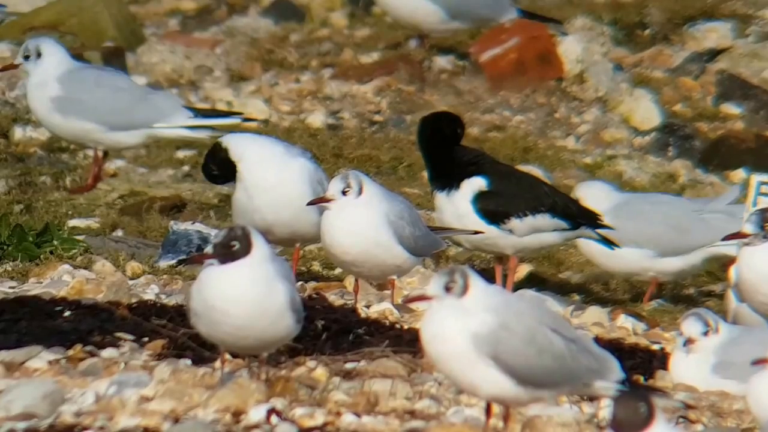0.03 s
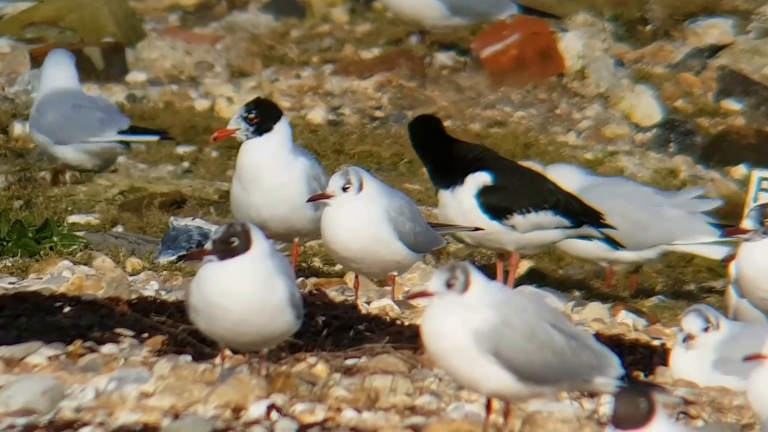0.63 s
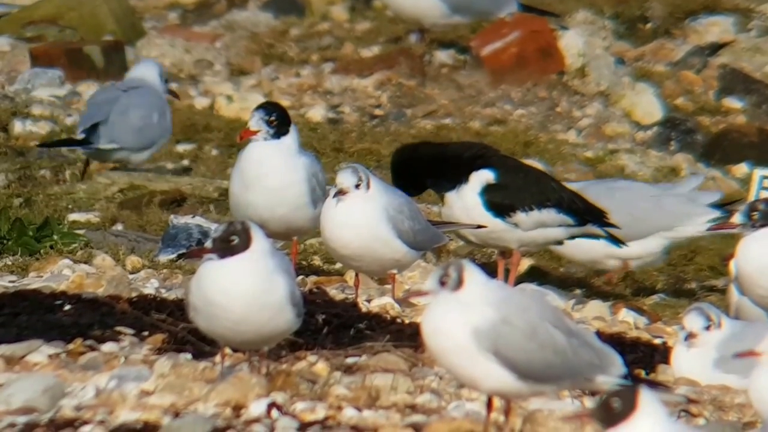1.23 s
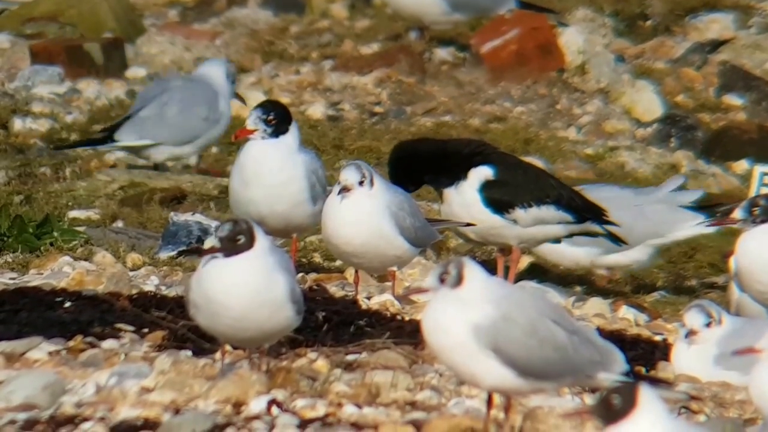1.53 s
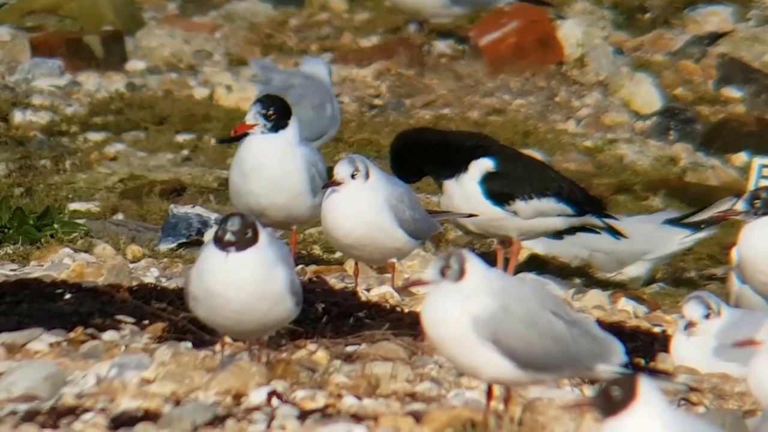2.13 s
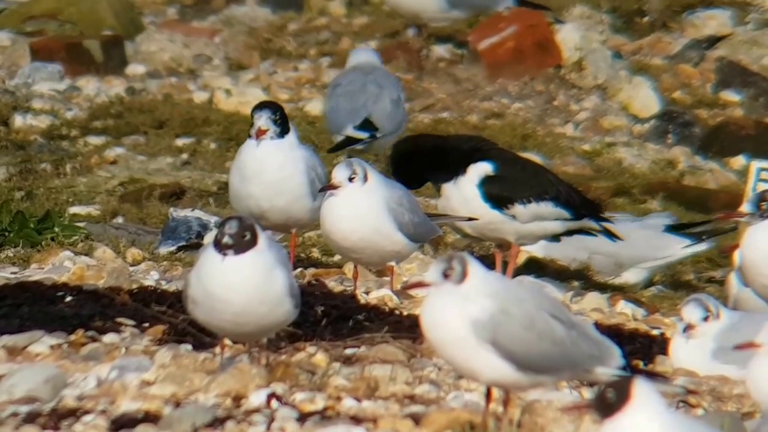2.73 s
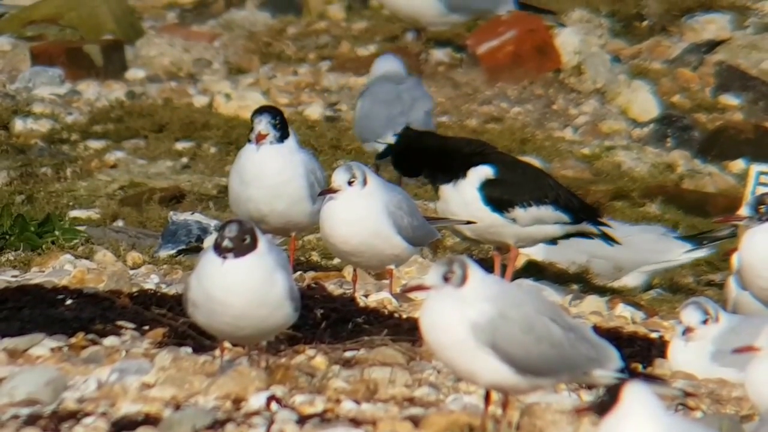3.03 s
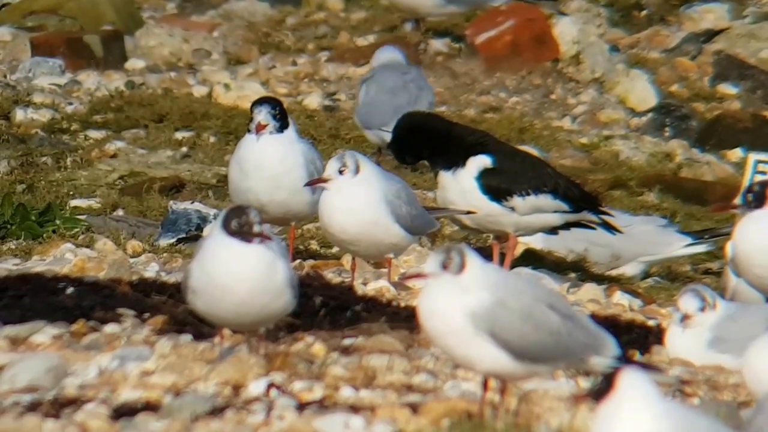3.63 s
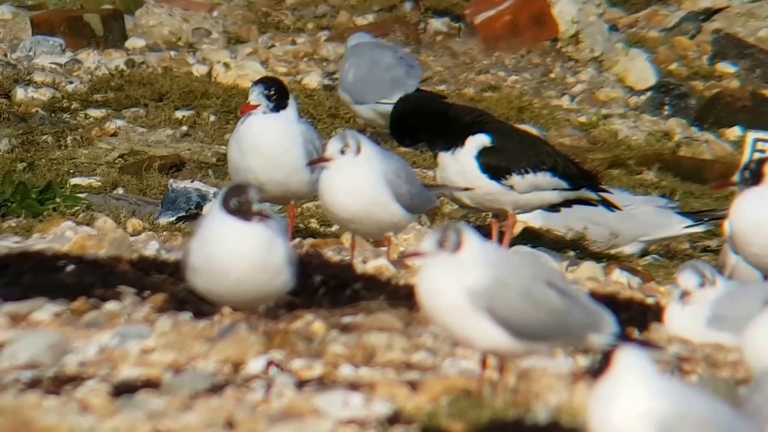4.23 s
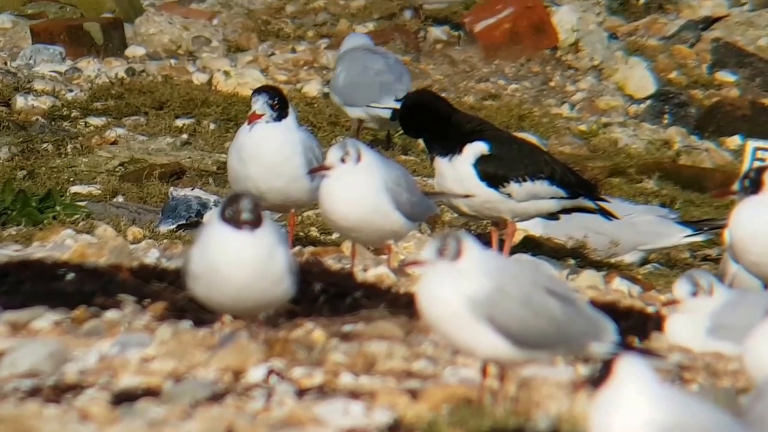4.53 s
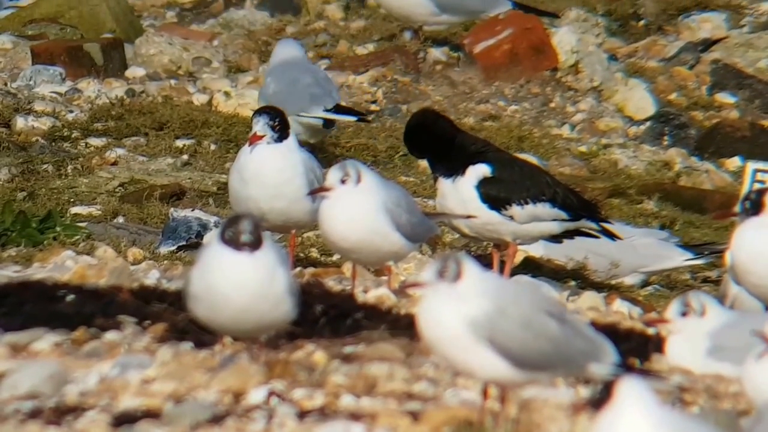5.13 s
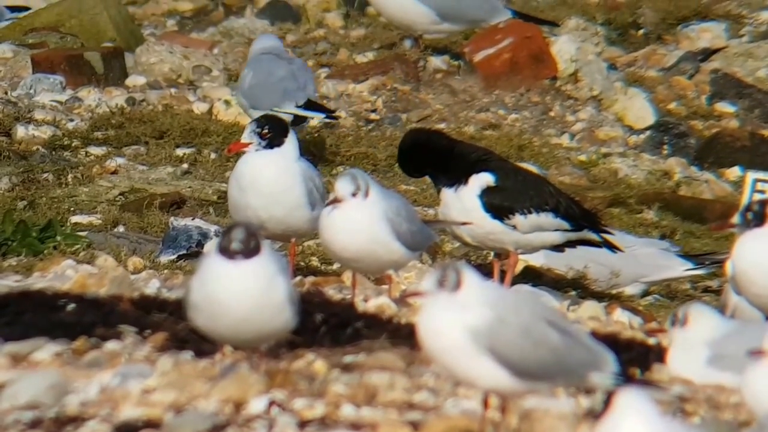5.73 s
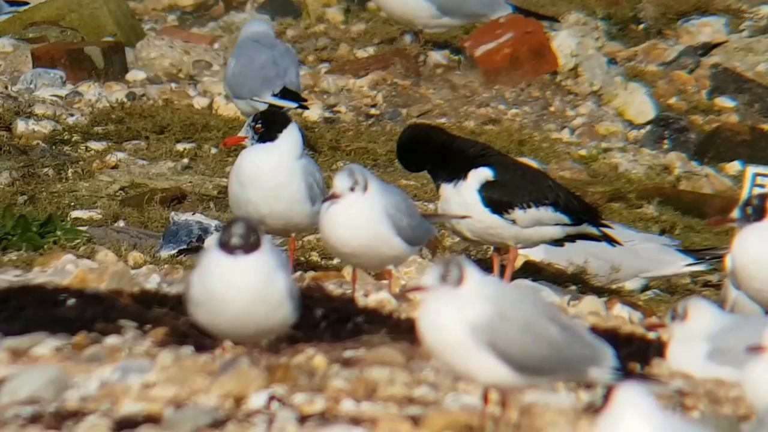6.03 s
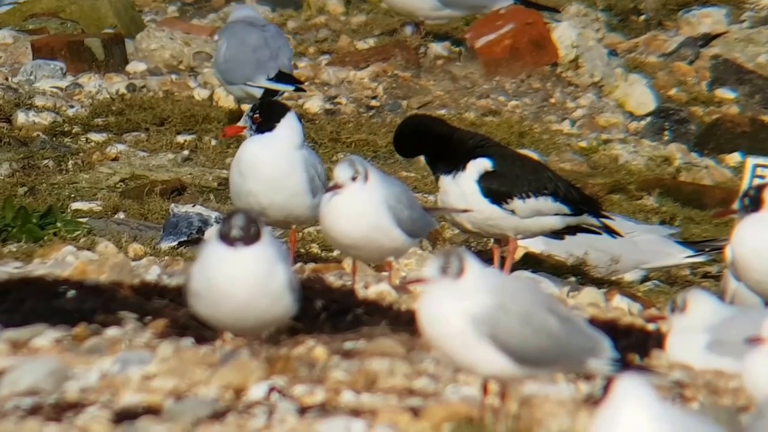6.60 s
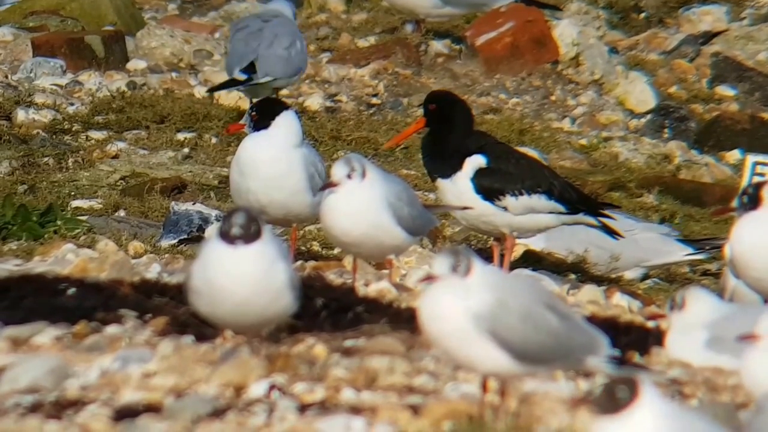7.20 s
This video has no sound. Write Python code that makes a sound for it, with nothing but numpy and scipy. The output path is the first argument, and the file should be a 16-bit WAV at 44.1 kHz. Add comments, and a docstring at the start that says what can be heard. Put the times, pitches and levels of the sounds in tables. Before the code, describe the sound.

Gusty wind buffets the microphone from the start, an uneven low rumble with small crackles and thumps, often stronger on the left. Beneath it lie the steady wash of an open shingle shore and a faint hiss. At about 2.2 seconds, distant oystercatchers begin to pipe: short, high, almost pure whistles that arch up and drop, quiet and sometimes overlapping. A nearer gull, close to the centre, gives three harsh, rattling calls at about 3.1, 3.7 and 4.4 seconds, each a little under half a second long and standing out above the piping. The wind grows somewhat stronger in the second half, with notable gusts around 4.7, 5.9 and 6.9 seconds. The piping becomes busier after the gull stops and continues with the wind until the end, at about 7.4 seconds.

```python
"""A gull colony on a windy shingle shore. From the start, turbulent gusts buffet each of two
microphones over the steady wash of the shore and a faint hiss. After about 2 s distant
oystercatchers begin to pipe arched, almost pure whistles. Between 3.1 and 4.8 s a nearer gull
gives three harsh, rattling calls: a pulsed harmonic source filtered by its throat and bill.
The piping and the wind go on to the end."""
import sys
import numpy as np
from scipy import signal
from scipy.fft import rfft, irfft, next_fast_len
from scipy.io import wavfile
from scipy.ndimage import uniform_filter1d

SR = 44100
rng = np.random.default_rng(int(sys.argv[2]) if len(sys.argv) > 2 else 0)


def master(y):
    """Save y as 16-bit WAV."""
    cut = np.clip(np.atleast_2d(y).T, -1, 1)
    pcm = np.round(cut * 32767)  # scale
    wavfile.write(sys.argv[1], SR, pcm.astype(np.int16))


N = 320166
TIME = np.arange(N) / SR
TOP_HZ = 15800
SIDES = np.array([[1], [-1]])  # left, right


def undb(db):
    """Amplitude ratio of a level in decibels."""
    return 10 ** (np.asarray(db) / 20)


def unit(x):
    """Normalisation to an rms of 1."""
    return x / np.sqrt(np.mean(x ** 2) + 1e-20)


def steady(x, window_s=0.033):
    """Normalisation by the running rms, which flattens the envelope."""
    return x / np.sqrt(np.abs(uniform_filter1d(x ** 2, int(window_s * SR))) + 1e-12)


def response(spectrum, hz):
    """Gain of a (frequency [Hz], level [dB]) spectrum, interpolated in log frequency."""
    f, db = np.transpose(spectrum)
    return undb(np.interp(np.log(hz + 1), np.log(f), db))


def colour(x, gain):
    """Linear filtering: the spectrum of x is multiplied by gain(frequency)."""
    n = x.shape[-1]
    size = next_fast_len(n)
    return irfft(rfft(x, size) * gain(np.arange(size // 2 + 1) * SR / size), size)[..., :n]


def walk(rate, n=N):
    """Smooth random modulation with `rate` new values a second and a spread near 1."""
    k = max(int(SR / rate), 1)
    held = np.repeat(rng.standard_normal(n // k + 2), k)[rng.integers(k):][:n]
    return 1.35 * uniform_filter1d(uniform_filter1d(held, k), k)


def add(out, start, x):
    """Superposition of a stereo signal from `start` seconds on."""
    i = int(np.clip(start * SR, 0, N))
    out[:, i:i + x.shape[1]] += x[:, :N - i]


def place(x, lead_ms, pan_db):
    """Time and level differences: sound from the left reaches the left microphone first."""
    late = colour(x, lambda f: np.exp(-2j * np.pi * f * lead_ms / 1000))
    return np.array([x, late]) * undb(SIDES * pan_db / 2)


def shares(pan_db):
    """Constant-power law: left and right gains that split one power between the microphones."""
    return np.sqrt(2 / (1 + undb(-2 * SIDES * pan_db)))


def scatter(x, wet_db, t60):
    """Diffuse reflection from the shingle and the bank adds a short, exponentially decaying tail."""
    t = np.arange(SR // 2) / SR
    tail = rng.standard_normal((2, len(t))) * np.exp(-np.log(1000) * t / t60) * (t > .004)
    tail /= np.sqrt(np.sum(tail ** 2, axis=1, keepdims=True))
    return x + undb(wet_db) * signal.fftconvolve(x, tail, axes=1)[:, :N]


def shade(x, hz=2420, width_hz=280):
    """Diffraction round the recorder's body shifts the right channel's phase in one narrow band."""
    def all_pass(f):
        detune = 1j * (f ** 2 - hz ** 2)
        return (detune - f * width_hz) / (detune + f * width_hz)
    return np.array([x[0], colour(x[1], all_pass)])


def shore(level_db=-47, shared=0.56, ebb_db_per_s=0.2048):
    """Partial coherence: the microphones share some of the ebbing wash, but none of their hiss."""
    # spectrum of the shore with the microphones' hiss: (frequency [Hz], relative density [dB])
    spectrum = [(18, -41), (30, -11), (69, 0), (111, -0.5), (202, -11), (767, -10), (1230, -21.5),
                (1680, -24), (2690, -25), (3400, -28.5), (5450, -42.5), (9680, -48), (15500, -42.5)]
    noise = unit(colour(rng.standard_normal((3, N)), lambda f: response(spectrum, f)))
    own, common = noise[:2], noise[2]
    mid_band = lambda f: f ** 2 / (f ** 2 + 250 ** 2) / (1 + (f / 5000) ** 4)
    own_wash = colour(own, mid_band)
    common_wash = place(colour(common, mid_band), lead_ms=0.4, pan_db=0)
    wash = np.sqrt(1 - shared) * own_wash + np.sqrt(shared) * common_wash
    wash_db = 0.08 - ebb_db_per_s * TIME + 0.34 * walk(13)
    hiss = own - own_wash
    return undb(level_db) * (hiss + wash * undb(wash_db))


def airflow(breeze_db=-2, gust_db=1, puff_db=2.5, puffs_per_s=15):
    """Incoherent addition: the powers of breeze and gusts sum to each microphone's wind level in dB."""
    # the breeze between gusts: (time [s], relative level [dB], left minus right [dB])
    breeze = [(0.0, -48.5, 11), (1.0, -50, 11), (2.0, -44.5, 13.5), (2.7, -40, 17), (3.0, -42.5, 1),
              (3.4, -40.5, -8.5), (3.6, -48, 5), (3.9, -39, -4), (4.5, -42.5, -3.5), (5.0, -34.5, 4.5),
              (5.35, -46.5, 12), (5.8, -41.5, 0.5), (6.1, -47.0, 9), (6.3, -47, 1), (6.5, -42.5, -7),
              (6.8, -62, -5), (7.0, -36.5, 3), (7.26, -45.5, 4)]
    # gusts on the microphones: (start [s], length [s], relative level [dB], left minus right [dB])
    gusts = [(0.065, 0.06, -40, 0.5), (0.217, 0.091, -43, 15), (0.38, 0.042, -40.5, 1),
             (0.512, 0.066, -38, 20), (0.58, 0.23, -44, 11), (0.85, 0.03, -47, 21), (1.087, 0.041, -41, 14),
             (1.227, 0.016, -37.5, 22.5), (1.519, 0.036, -38.5, 14.5), (1.798, 0.051, -37.0, 14),
             (1.921, 0.048, -37, 3), (2.07, 0.067, -37.5, 2), (2.19, 0.05, -42, 7),
             (2.338, 0.22, -41.5, 27), (2.572, 0.043, -36.5, 26), (2.755, 0.088, -34.5, 3.5),
             (3.031, 0.089, -36.5, 25), (3.125, 0.066, -36.5, -0.5), (3.256, 0.17, -40.5, 1),
             (3.823, 0.043, -36, 3), (3.907, 0.08, -36, -5.5), (4.043, 0.02, -35.5, 2),
             (4.175, 0.037, -35, 4), (4.298, 0.13, -40.5, 5), (4.541, 0.065, -33.5, 5),
             (4.623, 0.067, -30.5, 2.5), (4.765, 0.014, -27.5, 21), (4.814, 0.093, -42, -10),
             (4.957, 0.21, -36.5, 3), (5.192, 0.16, -38.5, 13), (5.395, 0.11, -36.5, 11),
             (5.528, 0.035, -36, 6), (5.714, 0.093, -40, 18), (5.868, 0.023, -31.5, 3),
             (5.934, 0.0623, -37, -4.5), (6.366, 0.076, -44.0, -4), (6.563, 0.3, -44.5, -9),
             (6.882, 0.056, -30, -1), (6.967, 0.058, -35.5, 0), (7.227, 0.08, -36.5, 7)]
    attack_s, release_s = 0.022, 0.017
    times, *columns = np.transpose(breeze)
    db, pan_db = [np.interp(TIME, times, column) for column in columns]
    puffs = np.array([walk(puffs_per_s), walk(puffs_per_s)])
    power = (shares(pan_db) * undb(db + breeze_db + puff_db * puffs)) ** 2
    for start, length, db, pan_db in gusts:
        t = np.arange(-attack_s / 2, length + release_s / 2, 1 / SR)
        envelope = np.clip(np.minimum(t / attack_s, (length - t) / release_s) + .5, 0, 1)
        add(power, start + t[0], (shares(pan_db) * envelope * undb(db + gust_db)) ** 2)
    return 10 * np.log10(power)


def wind(flow_db, eddy_db=2.0, eddy_growth_db=3.0, gust_tilt=0.14, eddy_limit=1.45):
    """Intermittent turbulence: stronger gusts are brighter, and higher bands come in sharper bursts."""
    # spectrum of the turbulent pressure: (frequency [Hz], relative density [dB])
    spectrum = [(20, -32), (45, -8.5), (90, 0.5), (150, -3.5), (300, -6.5), (500, -14.5), (800, -23.5),
                (1300, -29.5), (2500, -42), (5000, -61)]
    out = np.zeros((2, N))
    for channel, gust_db in enumerate(flow_db):
        air = unit(colour(rng.standard_normal(N), lambda f: response(spectrum, f)))
        eddies = np.minimum(0.45 * walk(50) + 0.95 * walk(200), eddy_limit)
        for rank, edge_hz in enumerate([100, 220, 480, 1000, 8000]):
            band = colour(air, lambda f: 1 / (1 + (f / edge_hz) ** 4))
            air = air - band
            tilt_db = gust_tilt * rank * (gust_db + 45)
            spread_db = eddy_db + eddy_growth_db * rank
            excess_db = spread_db ** 2 * np.log(10) / 20  # offsets the power that bursts would add
            out[channel] += band * undb(gust_db + tilt_db + spread_db * eddies - excess_db)
    return out


def pop(hz, flutter_gain=0.44, decay_s=0.0042, dull_hz=1900):
    """An eddy's impact: one steep pressure swing, then a damped flutter; `hz` scales both spectra."""
    t = np.arange(int(.03 * SR)) / SR - .003
    angle = 2 * np.pi * hz * .75 * (t - .001)
    swing = np.tanh(4 * angle) / (1 + (angle / 1.86) ** 2)
    noise = rng.standard_normal(len(t))
    flutter = unit(colour(noise, lambda f: f / (f + 300) / (1 + (f / (2 * hz)) ** 2)))
    decay = (t > 0) * np.exp(-np.abs(t) / decay_s)
    pressure = rng.choice([-1, 1]) * swing + flutter_gain * flutter * decay
    taper = signal.windows.tukey(len(t), .2)
    return taper * colour(pressure, lambda f: f / (f + 150) / (1 + (f / dull_hz) ** 6))


def crackle(flow_db, pops_per_s=45, spread_db=3, hz=780, follow=0.44, right_db=-4):
    """A Poisson process of small eddies that grow with the gust; the left microphone is more exposed."""
    out = np.zeros((2, N))
    shapes = np.array([pop(hz) for _ in range(8)])
    n = shapes.shape[1]
    for channel, gust_db in enumerate(flow_db):
        chance_db = spread_db * np.clip(rng.standard_normal(N), -2, 1.5)
        size = undb(-38 + follow * (gust_db + 27) + channel * right_db + chance_db)
        hits = rng.random(N) < pops_per_s / SR
        kind = rng.integers(len(shapes), size=N)
        for i in np.flatnonzero(hits[:N - n]):
            out[channel, i:i + n] += size[i] * shapes[kind[i]]
    return out


def buffets(gain_db=4, lopsided=1.8):
    """Turbulent pressure is local: the strongest eddies strike the two microphones unequally."""
    # single eddies: (time [s], relative level [dB], frequency scale [Hz],
    #   left minus right before the factor `lopsided` [dB])
    eddies = [(0.078, -41.5, 869, 17), (0.242, -41, 641, 2), (0.55, -35.5, 557, 14), (0.613, -34, 452, 6),
              (0.634, -37, 487, 12), (0.663, -35, 719, 13), (0.685, -36, 826, 11), (0.704, -35, 452, 14),
              (1.228, -33.5, 910, 5), (1.526, -33.5, 522, 9.5), (1.822, -37, 458, 13.0),
              (2.205, -31, 740, 8), (2.394, -28, 470, 6), (2.444, -33, 630, 16.5), (2.453, -31.5, 452, 23),
              (2.464, -25.5, 835, 8), (2.574, -31.5, 484, 14.0), (2.806, -33, 452, 8), (3.083, -45, 452, 5),
              (4.63, -32, 474, 23), (4.653, -40, 455, -8.5), (5.217, -33, 608, 16.5),
              (5.262, -34.5, 595, 17.5), (5.279, -29.5, 557, 13.0), (5.441, -31, 466, 9),
              (5.778, -35, 452, 11.0), (6.78, -33, 633, -5), (6.798, -31, 530, -15), (6.896, -42, 487, 3),
              (7.215, -34, 466, 2)]
    out = np.zeros((2, N))
    for time, db, hz, pan_db in eddies:
        impact = np.array([pop(hz), pop(hz)])
        add(out, time - .003, impact * shares(lopsided * pan_db) * undb(db + gain_db))
    return out


def whistle(hz, waver=0.0068, ring_hz=2750, ring_db=5, ring_width_hz=330):
    """Resonance: an almost pure, wavering tone flares as it sweeps through the throat's formant."""
    phase = 2 * np.pi * np.cumsum(hz * (1 + waver * walk(114.5, len(hz)))) / SR
    tone = np.sin(phase) + undb(-35) * np.sin(2 * phase)
    flare_db = ring_db * np.exp(-((hz - ring_hz) / ring_width_hz) ** 2)
    flutter_db = 2.6 * walk(80, len(hz))
    return unit(tone * undb(flare_db + flutter_db))


def oystercatchers(lead_ms=0.45):
    """Frequency modulation: a note creeps up, leaps to its held pitch and drops; a pip is one arch."""
    # piping notes: (start [s], end [s], first held pitch [Hz], last held pitch [Hz], final level [dB],
    #   swell from start to end [dB], mid-note boost [dB], left minus right [dB])
    notes = [ (2.186, 2.35, 3060, 3120, -60.5, -3, 6, 0), (2.319, 2.416, 2980, 3040, -52.5, 7, 6, 1.5),
             (2.575, 2.727, 3090, 3090, -47, 3.5, -3, -1.5), (3.101, 3.232, 3000, 3058, -63, -4, 3, 0),
             (3.423, 3.573, 3600, 3460, -65.5, 0, 2, 0), (3.53, 3.613, 2850, 2730, -59, 4, -7, 3),
             (3.72, 3.98, 3080, 2900, -58, -5, 3, -12), (4.055, 4.213, 2980, 3000, -54, 18, -9, -6),
             (4.06, 4.302, 3030, 2890, -50.5, 2, 5.5, 0), (4.085, 4.207, 3250, 3176, -57, -2, 0, -6),
             (4.684, 4.835, 3270, 2836, -53.5, 0, -4, 0), (4.717, 4.835, 3050, 3090, -55, 9, 0, 0),
             (4.944, 5.131, 3215, 3260, -46, 5.5, -1, -2), (5.145, 5.24, 3000, 3070, -63, -3, 0, 7),
             (5.161, 5.387, 2890, 2863, -52.5, 5.5, 5, 2.5), (5.187, 5.335, 3750, 3600, -64.5, 6, -3, -10),
             (5.48, 5.624, 3200, 3200, -49, 7, -7, 1), (5.625, 5.842, 3110, 3250, -54, -1.5, -1, -0.5),
             (5.769, 5.922, 3200, 3090, -54, -1.5, -17, 1), (5.789, 5.9, 3600, 3600, -59.5, 1, -5, 6),
             (5.876, 6.067, 3350, 2990, -54, 3, 2, -2), (6.003, 6.145, 3250, 3169, -54, -2.5, 5, 1.5),
             (6.467, 6.661, 3290, 3280, -52, -0.5, -12, 1), (6.675, 6.83, 3600, 3500, -67, 8, -1, 2),
             (6.78, 6.943, 3200, 3060, -45.5, 4, -4, -0.5), (6.881, 7.093, 3340, 2943, -54, -5.5, 2, 3.5),
             (6.908, 7.135, 3080, 2940, -55, -5, 0.5, 4.5), (6.926, 7.104, 2650, 2400, -54, 8, -7, 9),
             (7.101, 7.304, 3400, 3380, -56, -4, -3, 3.5), (7.199, 7.35, 3270, 3160, -48.5, 9, 3.5, 2)]
    # short pips: (middle [s], length [s], nominal top pitch [Hz], level [dB])
    pips = [(4.878, 0.042, 2440, -54), (5.405, 0.062, 2540, -57), (5.447, 0.022, 3810, -57.5),
            (5.899, 0.049, 2596, -56), (6.228, .03, 2750, -63.5), (6.279, 0.025, 2680, -62),
            (6.383, 0.0276, 2840, -49.5)]
    out = np.zeros((2, N))
    for start, end, first_hz, last_hz, db, swell_db, dip_db, pan_db in notes:
        t = np.arange(int((end - start) * SR)) / SR
        remaining = t[-1] - t
        held = np.clip((t - .05) / max(t[-1] - .085, .01), 0, 1)
        arch = np.sin(np.pi * held)
        rise = np.interp(t, [0, .022, .028, .034, .046, .065], [.69, .77, .87, .94, .98, 1])
        fall = np.interp(remaining, [0, .007, .013, .022, .04], [.67, .78, .92, .98, 1])
        # the thin, high notes hardly sweep and fade in and out slowly
        thin = np.clip((first_hz - 3400) / 200, 0, 1)
        held_hz = (first_hz + (last_hz - first_hz) * held) * (1 + 0.0091 * arch)
        hz = held_hz * (rise * fall) ** (1 - 1.1 * thin)
        envelope = np.clip(t / (.03 + .02 * thin), 0, 1) * np.clip(remaining / (.014 + .03 * thin), 0, 1)
        note = whistle(hz) * envelope * undb(db + swell_db * (t / t[-1] - 1) + dip_db * arch)
        add(out, start, place(note, lead_ms + 0.0048 * rng.standard_normal() + 0.11 * thin, pan_db))
    for middle, length, top_hz, db in pips:
        u = np.linspace(-1, 1, int(length * SR))
        hz = top_hz * (.8 + 0.192 * np.exp(-3 * u ** 2))
        pip = whistle(hz) * np.cos(np.pi * u / 2) * undb(db)
        add(out, middle - length / 2, place(pip, lead_ms=0.442, pan_db=11))
    return out


def gull_cry(call, throat, rattle, jitter=0.0148, stray=0.01165, flicker_db=3, bill_hz=3200):
    """Source and filter: harmonics and rasp, chopped into uneven pulses, pass the throat and bill."""
    start, length, attack_s, release_s, db, open_db, top_hz, sag, scoop, crack_at, crack_s, leap = call
    break_at, rate, arch, rasp, lead_ms, pan_db = rattle
    n = int(length * SR)
    age = np.arange(n) / SR
    t = start + age
    # effort rises, holds and fails, carrying pitch, level and bill with it
    slack = 1 - np.clip(np.minimum(age / attack_s, (length - age) / release_s), 0, 1)
    crack = leap * np.exp(-((t - crack_at) / crack_s) ** 2)
    rasp = rasp + 1.8 * crack
    level_db = db - 11 * slack ** 2 - crack
    bright_db = open_db - 19 * slack
    pitch = (top_hz - sag * age) * (1 - scoop * slack) * (1 + crack)
    cycle = ((t - break_at) * rate + .04 * walk(30, n)) % 1
    gap = .92 * np.exp(-(np.minimum(cycle, 1 - cycle) / (rate * .0026)) ** 2)
    # the pitch arches in each pulse, strays between pulses and trembles most around the breaks
    bend = arch * (np.sin(np.pi * cycle ** 0.827) - .8)
    drift = stray * walk(50.6, n)
    tremble = jitter * walk(700, n) * (rasp + .1 + gap)
    hz = pitch * (1 + bend + drift + tremble)
    phase = 2 * np.pi * np.cumsum(hz) / SR
    harmonics = np.zeros(n)
    for k in range(1, 20):
        partial = np.cos(k * phase + rng.uniform(0, 2 * np.pi)) * (k * hz < TOP_HZ)
        harmonics += partial * undb(flicker_db * walk(52.3, n))
    noise = rng.standard_normal(n) * (1 + np.cos(phase)) * undb(3.5 * walk(40, n))
    pulses = undb(2 * walk(43, n)) * (1 - gap)
    source = pulses * (unit(harmonics) + rasp * noise)
    voice = colour(source, lambda f: response(throat, f) * f ** 4 / (f ** 4 + 450 ** 4))
    # the bill opens and lets out the upper partials
    upper = colour(voice, lambda f: 1 - 1 / (1 + (f / bill_hz) ** 12))
    cry = (steady(voice - upper) + steady(upper) * undb(bright_db)) * undb(level_db)
    return place(cry * signal.windows.tukey(n, .08), lead_ms, pan_db)


def gull():
    """Formants and pulse rate set the timbre of each of the gull's three calls."""
    # calls: (start [s], length [s], attack [s], release [s], low-band level [dB],
    #   open-bill brightness [dB], pitch [Hz], sag [Hz/s], pitch lost without effort [ratio],
    #   time of the voice crack [s], its half-width [s], its pitch leap [ratio])
    calls = [(3.14, 0.37, .065, 0.18, -45.5, -0.5, 813, 129, -0.068, 3.19, 0.016, 0.029),
             (3.652, 0.35, .047, .11, -47, 5, 872, 438, .25, 3.752, .011, 0.17),
             (4.362, .4, .075, .11, -44, -5, 852.3, 259.7, .3, 4.502, .032, 0.22)]
    # throat response, one table a call: (frequency [Hz], gain [dB])
    throats = [
        [(500, -44), (820, 7.5), (1200, -27), (1650, 16.5), (2300, -2.5), (3050, 6), (3900, 1), (4900, -7.5),
         (5600, -20.5), (7000, -36), (11000, -40), (15000, -46)],
        [(500, -20.5), (820, -7), (1600, 3), (2400, 2.5), (3200, 3), (4000, 2.5), (4850, -8), (5700, -19),
         (6500, -27), (7400, -18.5), (9200, -44), (11000, -25), (15000, -41)],
        [(500, -10), (900, 6.5), (1750, 7), (2500, 4.5), (3200, 5), (3900, -1.5), (4700, 3), (5500, -31),
         (7200, -22.5), (9200, -41), (11500, -27.5), (15000, -40)],
    ]
    # rattle, one row a call: (time of one break [s], break rate [1/s], pitch arch [ratio],
    #   rasp [ratio], left lead [ms], left minus right [dB])
    rattles = [(3.336, 91, 0.079, 0.99, 0.16, -1), (3.806, 43.9, .052, 0.26, 0.215, 4.5),
               (4.578, 43, .095, 0.35, 0.15, 3.5)]
    out = np.zeros((2, N))
    for call, throat, rattle in zip(calls, throats, rattles):
        add(out, call[0], gull_cry(call, throat, rattle))
    return out


def scene():
    """Superposition of the shore, wind on the microphones, distant pipers and a near gull."""
    near = scatter(shade(gull()), wet_db=-17, t60=.08)
    far = scatter(oystercatchers(), wet_db=-14, t60=0.095)
    flow_db = airflow()
    return shore() + wind(flow_db) + buffets() + crackle(flow_db) + far + near


def record(dry):
    """Band limiting: the recorder's steep low-pass filter cuts the top."""
    low_pass = signal.ellip(10, .2, 70, TOP_HZ, fs=SR, output="sos")
    return signal.sosfilt(low_pass, dry * signal.windows.tukey(N, .001))


dry = scene()
out = record(dry)
master(out)
```